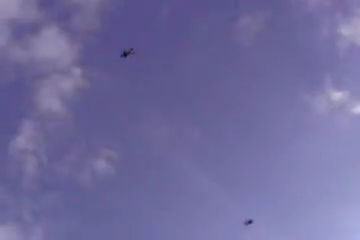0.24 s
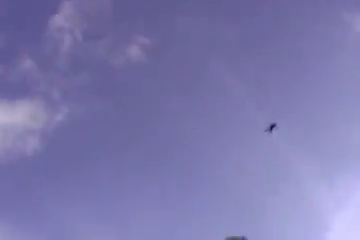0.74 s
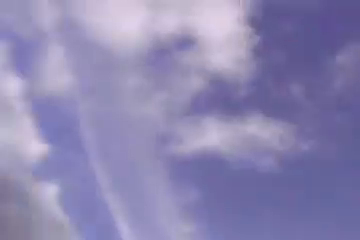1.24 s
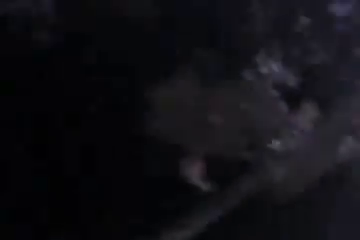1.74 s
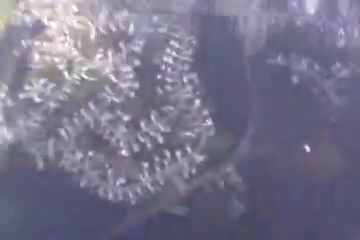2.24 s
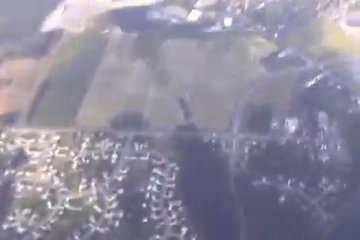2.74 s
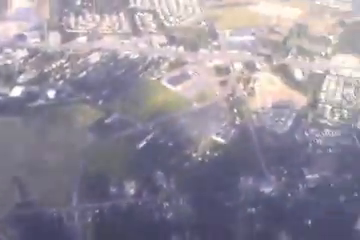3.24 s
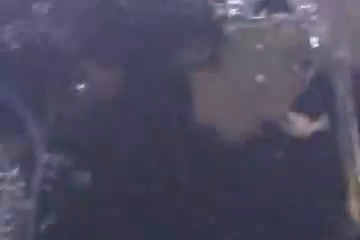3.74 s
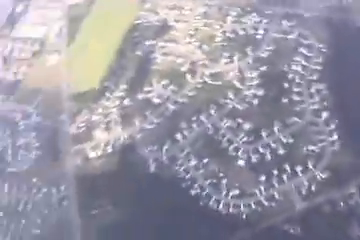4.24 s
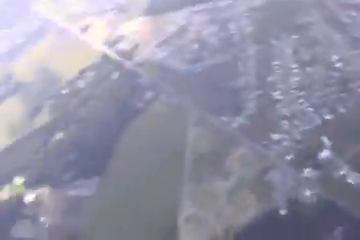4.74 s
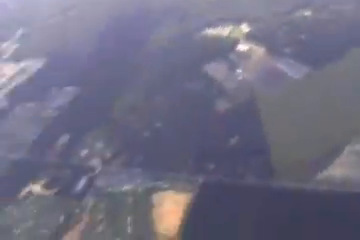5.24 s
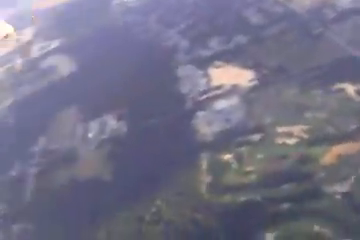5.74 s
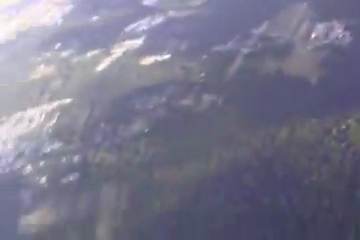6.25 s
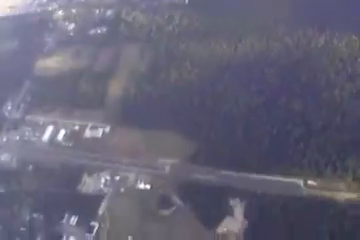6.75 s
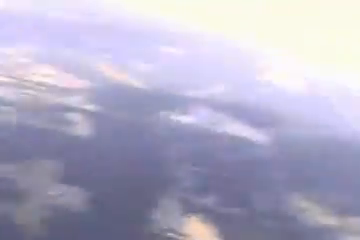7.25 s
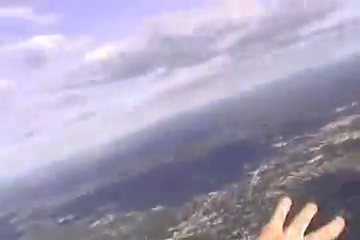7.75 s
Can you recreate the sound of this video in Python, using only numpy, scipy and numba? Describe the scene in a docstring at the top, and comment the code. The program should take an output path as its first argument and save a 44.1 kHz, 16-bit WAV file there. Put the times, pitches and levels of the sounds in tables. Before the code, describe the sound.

Loud, clipped wind fills everything from start to end, heard at a camera microphone worn by a skydiver tumbling through open sky. From 0 to 1.4 s it is a bright, dense, hissing rush, with faint swells beneath. Around 1.5 s it brightens and spreads wider, then drops into a darker lurch with heavy low thumps at 1.7 to 1.86 s. At about 1.9 s a narrow, breathy howl bursts out, rises slightly and sinks away by 2.4 s. From 2.5 to 4.5 s a hollow, mid-low roar wavers and flutters. After 4.7 s it becomes deep and rumbling, with uneven puffs of hiss and hard buffets, growing choppier to 6.45 s. A steadier hollow roar holds from about 6.9 to 7.5 s, then rough, rapid flapping and sputtering continue to the abrupt end at about 8 s. Loudness stays nearly level while the colour changes; the top treble is dulled.

```python
"""Freefall: air tears past a camera worn by a tumbling skydiver and overloads both microphone channels.
Facing the flow, small fast eddies hiss; in the wake of the body, big slow ones roar, rumble and flap.
Swept low-passed noise makes the eddies; its derivative makes swells, a howl and a hollow edge roar.
Noise around a loose shedding rate makes the vortices. Hard saturation holds the loudness nearly level
while the colour moves, and a fine fizz follows the sharp edges."""
import sys
import numpy as np
from scipy import signal
from scipy.fft import rfft, irfft, next_fast_len
from scipy.io import wavfile
from scipy.ndimage import map_coordinates
from numba import njit

SR = 44100
rng = np.random.default_rng(int(sys.argv[2]) if len(sys.argv) > 2 else 0)


def bounce(signal):
    """Save signal as a 16-bit WAV file at the path given by the first command-line argument."""
    frames = np.transpose(np.atleast_2d(signal))
    limited = np.clip(frames, -1, 1)
    pcm = np.round(limited * 32767).astype(np.int16)
    wavfile.write(sys.argv[1], SR, pcm)


N = 353241

PITCH_WANDER_OCTAVES = 0.046  # swells and hollow roar


def amp(db):
    """Decibels to gain."""
    return 10 ** (np.asarray(db) / 20)


def unit(x):
    """Scale to rms 1."""
    return x / np.sqrt(np.mean(x ** 2) + 1e-20)


def curve(rows):
    """Interpolate (seconds, value) rows to one value per sample."""
    seconds, values = np.transpose(rows)
    return np.interp(np.arange(N) / SR, seconds, values)


def wobble(rate_hz):
    """A smooth random curve with rate_hz knots a second."""
    knots = rng.standard_normal(int(N * rate_hz / SR) + 4)
    return map_coordinates(knots, [np.arange(N) * rate_hz / SR])


def spell(centre_s, length_s, edge):
    """A smooth window; edge 2 is a bell, a greater edge gives a flatter top."""
    distance = np.abs(2 * (np.arange(N) / SR - centre_s) / length_s)
    return np.exp(-np.minimum(distance, 10) ** edge)


def filtered(x, response):
    """Multiply the spectrum of x by a response of frequency."""
    size = next_fast_len(N + SR // 2)
    spectrum = rfft(x, size) * response(np.fft.rfftfreq(size, 1 / SR))
    return irfft(spectrum, size)[..., :N]


def coloured(x, points):
    """Shape x by (Hz, dB) points on a log frequency axis."""
    f, db = np.transpose(points)
    return filtered(x, lambda hz: amp(np.interp(np.log(hz + 1), np.log(f), db)))


@njit
def swept_lowpass(x, step, damping):
    """A two-pole low-pass whose corner and damping move with every sample."""
    out, s1, s2 = np.empty_like(x), 0.0, 0.0
    for i in range(len(x)):
        g = step[i]
        band = (s1 + g * (x[i] - s2)) / (1 + g * (g + damping[i]))
        out[i] = s2 + g * band
        s1 = 2 * band - s1
        s2 = 2 * out[i] - s2
    return out


def eddies(hz, q):
    """Turbulent pressure of rms about 1: flat up to the eddy rate, shaped there by q, then a steep fall."""
    step = np.tan(np.pi * np.clip(hz, 20, SR / 4) / SR) * np.ones(N)
    q = np.maximum(q, 1 / 4) * np.ones(N)
    noise = rng.standard_normal(N) / np.sqrt(step * q)  # keeps the power as the corner moves
    return swept_lowpass(noise, step, 1 / q)


def ports(shared, differing, likeness):
    """Left and right pressure with the given correlation."""
    turn = np.arccos(np.clip(likeness, -1, 1)) / 2
    mid, side = np.cos(turn) * shared, np.sin(turn) * differing
    return np.array([mid + side, mid - side])


# Turbulence as the body turns in and out of the flow.
# Each row: time in seconds, eddy rate in Hz before gusts and puffs.
FLOW_ROWS = [(0, 1650), (.85, 1520), (1.1, 2170), (1.42, 1850), (1.51, 2480), (1.63, 1415), (1.68, 826),
             (1.725, 700), (1.765, 1330), (1.85, 1700), (1.9, 2170), (2.28, 1300), (2.49, 716), (2.55, 564),
             (3.1, 562), (3.17, 826), (3.42, 705), (3.68, 505), (3.78, 720), (4.2, 766), (4.36, 467),
             (4.5, 447), (4.57, 554), (4.66, 440), (4.76, 307), (6.42, 286), (6.5, 318), (6.82, 296),
             (6.95, 674), (7.51, 660), (7.56, 320), (8.01, 298)]


def flow_rate():
    """Eddy rate at the ports in Hz: fast facing the flow, slow in the wake."""
    return curve(FLOW_ROWS)


# Spectrum shape of the finest eddies. Each row: frequency in Hz, relative density in dB.
HISS_SHAPE = [(300, -10.5), (1500, 3), (4000, 4.5), (9000, -5.5)]
EDDY_Q, FLAP_Q = 0.77, 0.34  # steady flow; full flapping
LIKENESS, LIKENESS_PER_OCTAVE2 = 0.56, 0.072  # left-right correlation; growth with depth squared
SPUTTER_DB, SPUTTER_DB_PER_OCTAVE, SPUTTER_HZ = 0.57, 0.53, 170.05  # flutter swing, growth, knot rate


def airflow(eddy_hz, depth, flapping, swing):
    """Eddies roar at partly alike ports and the finest hiss at each alone; all flutters together."""
    q = EDDY_Q + (FLAP_Q - EDDY_Q) * flapping
    likeness = LIKENESS + LIKENESS_PER_OCTAVE2 * depth ** 2 + swing
    roar = ports(eddies(eddy_hz, q), eddies(1.18 * eddy_hz, 0.85 * q), likeness)
    pickup = [(25, -5.5), (80, -3.5), (200, -2.0), (330, -1.8), (600, 0), (1200, -1.34), (2800, 4.5)]
    roar = coloured(roar, pickup)
    hiss_db = -17.4 - 3.2 * depth + 2 * wobble(70)  # weaker deep in the wake
    hiss = amp(hiss_db) * unit(coloured(rng.standard_normal((2, N)), HISS_SHAPE))
    sputter_db = (SPUTTER_DB + SPUTTER_DB_PER_OCTAVE * depth) * wobble(SPUTTER_HZ)
    return (roar + hiss) * amp(1.04 * wobble(45) + sputter_db)


def evened(x, evenness):
    """Pull the swings of a stereo pressure towards one size: 0 leaves them free, 1 most alike."""
    analytic = signal.hilbert(x, next_fast_len(N))[:, :N]
    size = np.sqrt(np.mean(np.abs(analytic) ** 2, axis=0))
    return unit(x / (size + 0.12 * size.mean()) ** np.clip(evenness, 0, 1))


# Single big eddies that push both ports alike.
# Each row: centre in seconds, length in seconds, pressure in units of the flow's rms.
SHOVE_ROWS = [(4.82, 0.0046, -6), (5.126, .005, 4), (5.246, 0.0075, -7), (5.425, .005, 2), (6.22, .006, 4),
              (6.3, 0.0046, 6), (6.327, .005, 4), (6.34, 0.007, -6), (6.37, .006, 12), (6.444, 0.006, 11),
              (7.699, .0065, 3), (7.758, 0.005, 12.5), (7.933, 0.0036, 9.5)]
BUFFET_DB, BUFFET_DB_PER_OCTAVE, FLAP_BUFFET_DB = -23.5, 8, 5.5  # open flow; per depth; full flapping
RUMBLE_EVENNESS = 0.34


def buffeting(depth, flapping, swing):
    """The wake rumbles on both ports; big shoves pin them, so saturation chokes the hiss."""
    level_db = BUFFET_DB + BUFFET_DB_PER_OCTAVE * depth + FLAP_BUFFET_DB * flapping + 1.13 * wobble(12)
    rumble = ports(eddies(106.0, 1.08), eddies(95.0, 0.76), 0.81 + swing)
    rumble = coloured(rumble, [(10, -10.0), (40, -4.5)])
    shoves = sum(push * spell(s, length_s, 2) for s, length_s, push in SHOVE_ROWS)
    return amp(level_db) * evened(rumble, RUMBLE_EVENNESS) + shoves


# Swells of band noise: low surges of the wake, thumps, and brighter rushes of air.
# Each row: centre in seconds, length in seconds, mean pitch in Hz, Q, level in dB before wavering.
SWELL_ROWS = [(0.491, 0.12, 71.8, 1.2, -14.5), (0.505, 0.93, 612, 2.3, -7), (0.647, .85, 139, 1.6, -16.5),
              (1.2, 0.42, 249, 4.1, -11), (1.443, .08, 1090, 2.3, -6), (1.707, 0.049, 107, 1, 8),
              (1.76, 0.084, 5670, 0.67, -6.5), (1.81, 0.06, 111, 0.88, -0.5), (1.857, 0.04, 126, 2.1, 3.5),
              (2.2, .25, 700, 1.4, -8), (2.43, 0.15, 300, 1.8, -2), (2.925, 0.14, 151, 2, -4),
              (3.683, 0.086, 122.5, 1.2, -2.5), (4.522, 0.27, 170, 2.3, -6), (4.73, .1, 149.4, 4, 0),
              (4.822, 0.074, 100.3, 2.4, -2), (5.205, 0.097, 153, 2.5, -3.5), (5.441, .14, 163.7, 4.4, 1.5),
              (5.679, 0.22, 160, 4.3, 0.5), (5.926, 0.11, 151, 4.2, 0.5), (6.765, 0.15, 199, 3.1, -2.5),
              (7.249, 0.56, 191.5, 3, -5), (7.722, 0.064, 85, 3.2, -5), (7.838, 0.11, 175, 3.3, -6)]
SWELL_EDGE, SWELL_WAVER_DB = 2.23, 1.5


def swells():
    """Low surges of the wake, thumps and brighter rushes of air, short or long: wavering noise bands."""
    out = np.zeros(N)
    for s, length_s, hz, q, db in SWELL_ROWS:
        wavering_hz = hz * 2 ** (PITCH_WANDER_OCTAVES * wobble(18))
        band = np.gradient(eddies(wavering_hz, q))
        out += amp(db + SWELL_WAVER_DB * wobble(11)) * unit(band) * spell(s, length_s, SWELL_EDGE)
    return out


# The ports swing across the flow (-) or square to it (+).
# Each row: centre in seconds, length in seconds, change of left-right correlation.
SWING_ROWS = [(1.574, 0.23, -0.6), (1.88, 0.25, 0.29), (3.29, 0.31, -0.0089), (7.556, 0.99, -0.12)]
SWING_EDGE = 3.9


def swings():
    """Change of left-right likeness as the ports turn to the flow."""
    return sum(change * spell(s, length_s, SWING_EDGE) for s, length_s, change in SWING_ROWS)


# Rate at which the body sheds vortices. Each row: time in seconds, mean rate in Hz before flapping.
SHEDDING_ROWS = [(2.3, 305), (2.9, 250), (3.3, 310), (3.68, 215), (3.9, 290), (4.1, 235), (4.55, 205),
                 (4.8, 170), (5.6, 160), (6.4, 155), (6.52, 204.5), (6.85, 209.8), (7.45, 214.9),
                 (7.65, 170)]
CORE_OCTAVES, VORTEX_DB, VORTEX_FADE_DB = 2.536, 1.52, -5  # core depth; level there; loss one octave away
SHED_WANDER_OCTAVES = 0.1
FLAP_OCTAVES, FLAP_VORTEX_DB = -0.3, -6  # at full flapping


def vortices(depth, flapping, swing):
    """Vortices peel off the body at a loose rate: a hollow rumble, nearly alike at both ports."""
    hz = curve(SHEDDING_ROWS) * 2 ** (FLAP_OCTAVES * flapping + SHED_WANDER_OCTAVES * wobble(8))
    fade_db = VORTEX_FADE_DB * np.abs(CORE_OCTAVES - depth) ** 1.51
    level_db = VORTEX_DB + fade_db + FLAP_VORTEX_DB * flapping + 1.7 * wobble(10)
    phase = 2 * np.pi * np.cumsum(hz) / SR

    def drift():
        return eddies(0.42 * hz, 0.65)

    def shed():
        return unit(np.cos(phase) * drift() + np.sin(phase) * drift())

    return amp(level_db) * ports(shed(), shed(), 0.941 + swing)


HOLLOW_HZ, HOLLOW_Q = 341.7, 2.88
EDGE_OCTAVES, HOLLOW_DB, HOLLOW_FADE_DB = 1.82, -5, -6  # edge depth; level there; loss one octave away


def hollow(depth, flapping, swing):
    """Air skimming the edge of the wake roars in a band around one pitch; flapping weakens it."""
    fade_db = HOLLOW_FADE_DB * np.abs(depth - EDGE_OCTAVES) ** 1.5
    level_db = HOLLOW_DB + fade_db - 7 * flapping + 1.5 * wobble(9)

    def band():
        wavering_hz = HOLLOW_HZ * 2 ** (PITCH_WANDER_OCTAVES * wobble(18))
        return unit(np.gradient(eddies(wavering_hz, HOLLOW_Q)))

    return amp(level_db) * ports(band(), band(), 0.87 + swing)


# An edge howls as the camera swings square into the flow.
# Each row: time in seconds, pitch in Hz, level in dB.
HOWL_ROWS = [(1.855, 1560, -63), (1.88, 1650, 1), (1.94, 1700, 4), (1.99, 1850, -0.5), (2.06, 1580, -5.5),
             (2.2, 1230, -8.5), (2.28, 1100, -13), (2.4, 990, -56)]
HOWL_Q = 3.6


def howl():
    """A narrow whoosh bursts out, rises a little, then sinks as the edge turns away."""
    seconds, pitch_hz, level_db = np.transpose(HOWL_ROWS)
    hz = curve(np.column_stack([seconds, pitch_hz]))
    db = curve(np.column_stack([seconds, level_db]))
    return amp(db) * unit(np.gradient(eddies(hz, HOWL_Q)) / hz)


# The fast flow breaks through to the ports (+) or drops away (-).
# Each row: centre in seconds, length in seconds, level change in dB.
PUFF_ROWS = [(2.842, .015, -3.5), (2.894, 0.0083, -4), (3.103, 0.0097, 2), (3.309, 0.036, 1.5),
             (3.374, 0.0074, -1.5), (3.484, .02, 0), (3.56, 0.036, -0.5), (3.622, .014, 11.5),
             (3.864, .015, 4), (3.936, 0.056, -0.5), (4.025, 0.017, -0.5), (4.121, 0.012, 0),
             (4.194, .025, 3), (4.857, 0.09, -1.5), (4.945, 0.034, 3), (5.04, 0.068, 4),
             (5.147, 0.053, -6.5), (5.254, 0.008, 7), (5.285, .05, -2.5), (5.354, 0.013, 4),
             (5.382, 0.016, 6.5), (5.423, .018, -7), (5.476, 0.021, 4), (5.512, 0.011, 6),
             (5.559, 0.023, -7), (5.733, .018, 2), (5.858, 0.055, 4), (5.945, 0.027, -7.5),
             (6.123, 0.046, -0.5), (6.163, .018, 10.5), (6.193, 0.02, 0), (6.251, 0.038, 4.5),
             (6.275, 0.013, -1), (6.303, 0.012, 7), (6.339, 0.016, -2.5), (6.353, 0.019, 8),
             (6.387, .02, 3.5), (6.422, 0.016, 8.5), (6.542, 0.027, 2), (6.696, 0.026, 1),
             (6.789, .02, 4.5), (6.867, 0.019, 4.5), (6.9, .025, -7), (6.94, 0.014, 2.5),
             (7.566, 0.011, -6.5), (7.577, .01, 1.5), (7.583, .012, -6), (7.605, 0.012, 6.5),
             (7.617, 0.013, -5.5), (7.67, 0.022, 2), (7.71, 0.0062, 3.5), (7.732, 0.0092, 4),
             (7.75, .014, 0.5), (7.77, .012, 8.5), (7.835, 0.016, 11.5), (7.855, 0.0094, 2.5),
             (7.887, 0.034, -7), (7.909, 0.012, 6.5), (7.939, 0.01, 5.5), (7.99, 0.022, 6)]


def puffs():
    """Level of the fast flow in dB as it breaks through the wake and drops away."""
    return sum(db * spell(s, length_s, 2) for s, length_s, db in PUFF_ROWS)


# Spells in which orderly shedding breaks up into slow flapping.
# Each row: start in seconds, end in seconds, strength 0-1.
FLAP_ROWS = [(5.9, 6.479, .7), (7.53, 8.1, 1)]
FLAP_RISE_S, FLAP_FALL_S = 0.14, 0.0411


def flaps():
    """How strongly the wake flaps, 0-1: a gradual rise and a quicker stop."""
    t = np.arange(N) / SR
    total = np.zeros(N)
    for start_s, end_s, strength in FLAP_ROWS:
        ramp = np.minimum((t - start_s) / FLAP_RISE_S, (end_s - t) / FLAP_FALL_S)
        total += strength * np.clip(ramp, 0, 1)
    return total


OPEN_HZ = 1638  # eddy rate at depth 0, facing the flow
EDDY_WANDER_OCTAVES, PUFF_OCTAVES_PER_DB = 0.084, 0.05  # gusts; stronger puffs bring faster eddies


def scene():
    """Air pressure at the two ports; depth in the wake steers the flow and wake layers."""
    eddy_hz = flow_rate()
    depth = np.log2(OPEN_HZ / eddy_hz)  # octaves below the open flow
    flapping, puff_db, swing = flaps(), puffs(), swings()
    state = (depth, flapping, swing)
    gusty_hz = eddy_hz * 2 ** (EDDY_WANDER_OCTAVES * wobble(14) + PUFF_OCTAVES_PER_DB * puff_db)
    flow = amp(puff_db) * airflow(gusty_hz, *state)
    wake = buffeting(*state) + vortices(*state) + hollow(*state)
    return flow + wake + swells() + howl()


# Spectrum shape of the fizz. Each row: frequency in Hz, relative density in dB.
FIZZ_SHAPE = [(200, -2.5), (1000, 4), (3000, -4), (6000, -7), (9000, -11.5)]


def fizz(x, above_hz, smear_s):
    """Fine noise whose level follows the smeared treble power of x."""
    edges = filtered(x, lambda hz: hz ** 2 / (hz ** 2 + above_hz ** 2))
    power = filtered(np.mean(edges ** 2, axis=0), lambda hz: np.exp(-(hz * smear_s) ** 2))
    noise = unit(coloured(rng.standard_normal((2, N)), FIZZ_SHAPE))
    return np.sqrt(np.abs(power)) * noise


# Stereo difference kept. Each row: frequency in Hz, gain in dB.
WIDTH_CURVE = [(2500, 0), (4500, -1.5), (6000, -3), (8000, -21.5)]


def narrowed(x):
    """Filter the left-right difference so the highest treble sits near the centre."""
    side = coloured((x[0] - x[1]) / 2, WIDTH_CURVE)
    return x.mean(axis=0) + np.array([side, -side])


# Colour of the camera after the overload. Each row: frequency in Hz, gain in dB.
CAMERA_COLOUR = [(200, 1.5), (1200, 0.1), (2800, -1.5), (5000, -2), (7000, -3), (8300, -6), (9300, -17)]
TOP_HZ = 9600


def record(dry):
    """The input stage saturates hard; the camera dulls the result and keeps nothing above its band limit."""
    squared = amp(-7.5) * np.tanh(amp(12.5) * dry)
    sound = squared + amp(-2.5) * fizz(squared, above_hz=1240, smear_s=0.015)
    sound = coloured(narrowed(sound), CAMERA_COLOUR)
    return filtered(sound, lambda hz: hz < TOP_HZ)


dry = scene()
out = record(dry)
bounce(out)
```